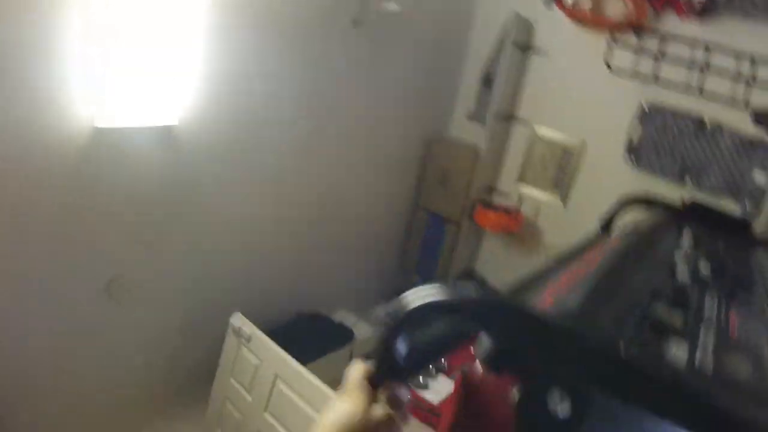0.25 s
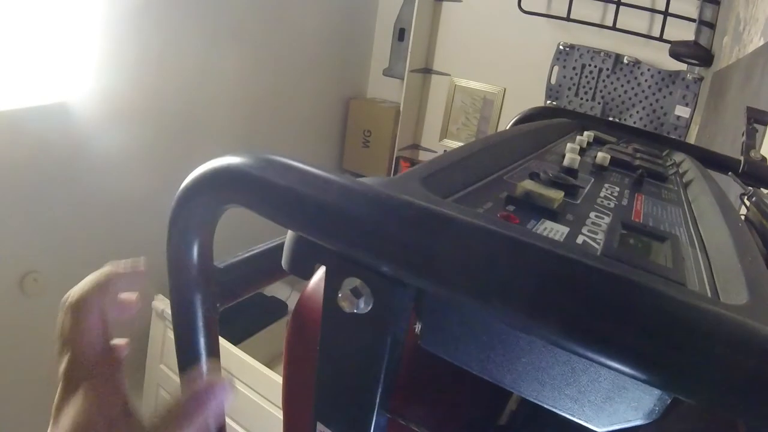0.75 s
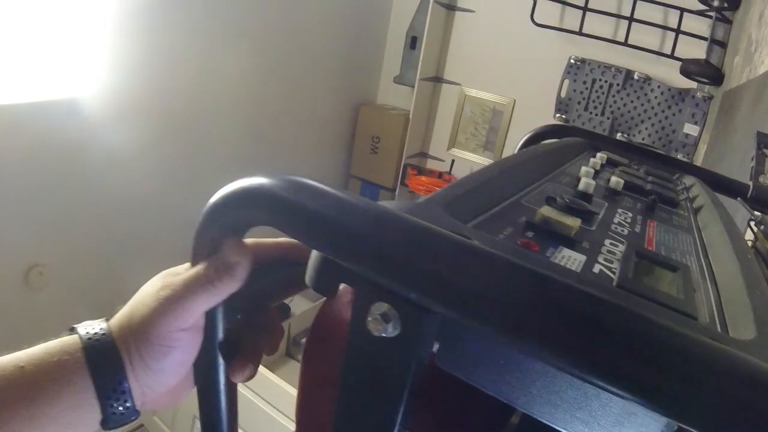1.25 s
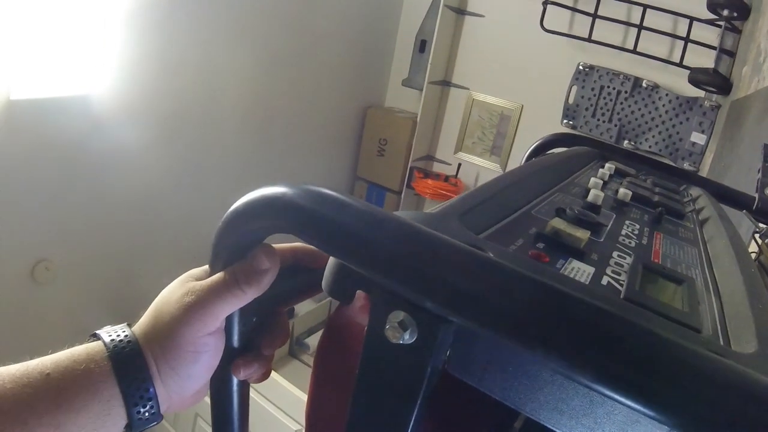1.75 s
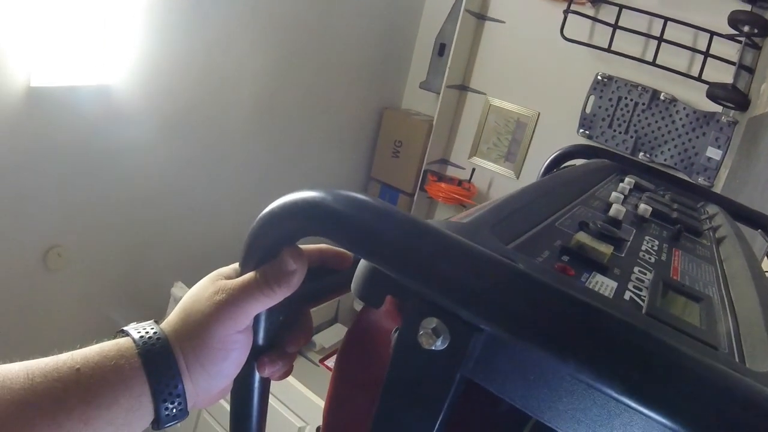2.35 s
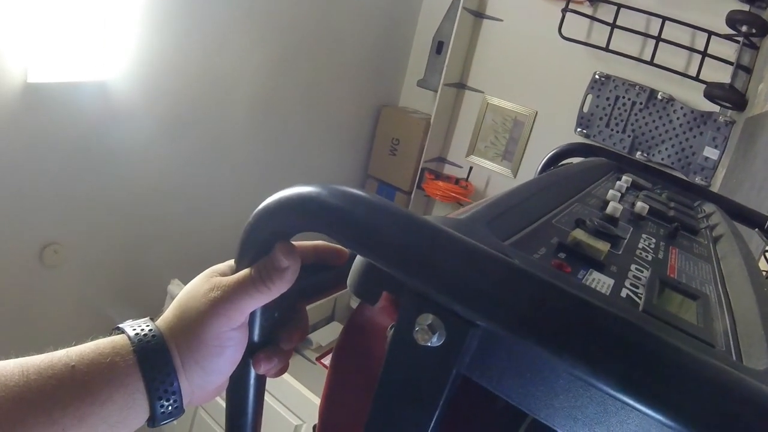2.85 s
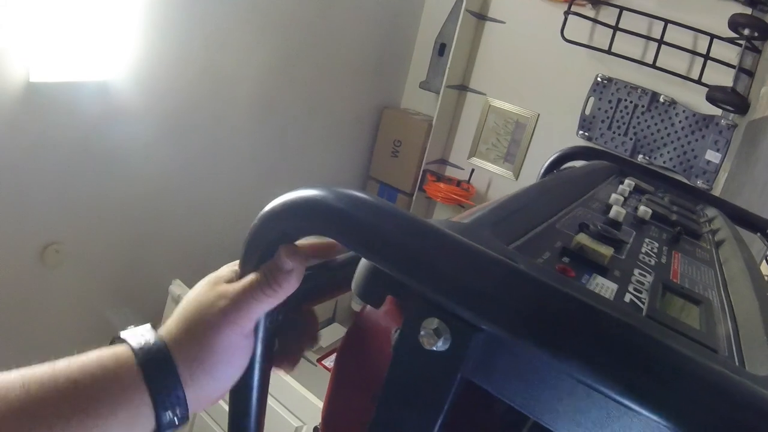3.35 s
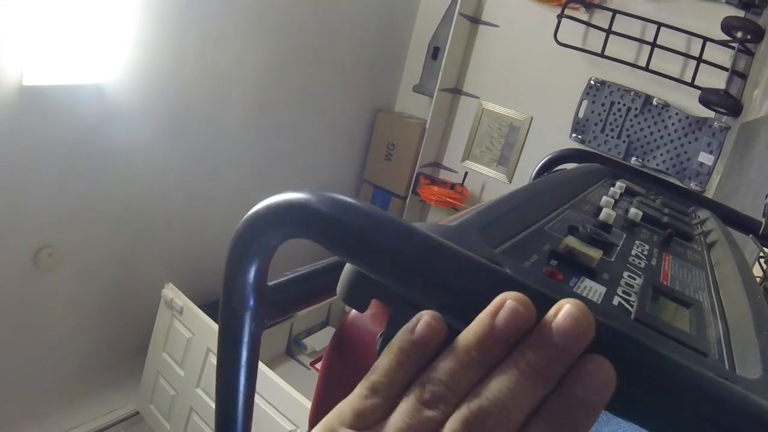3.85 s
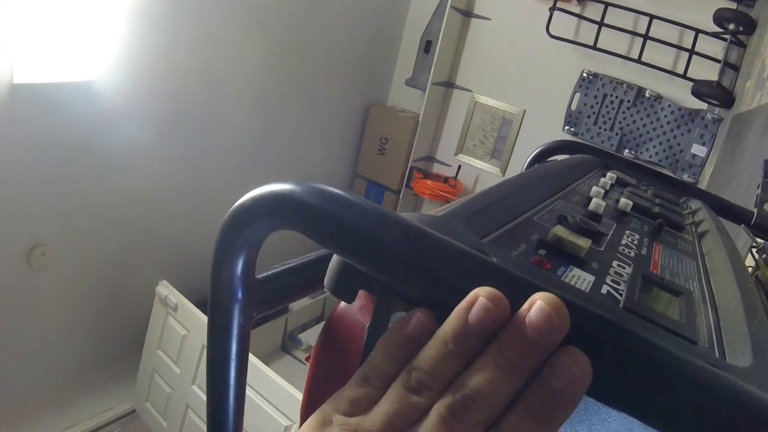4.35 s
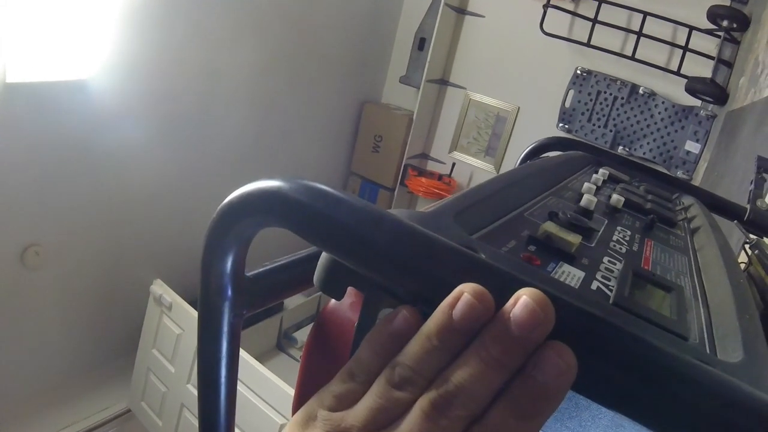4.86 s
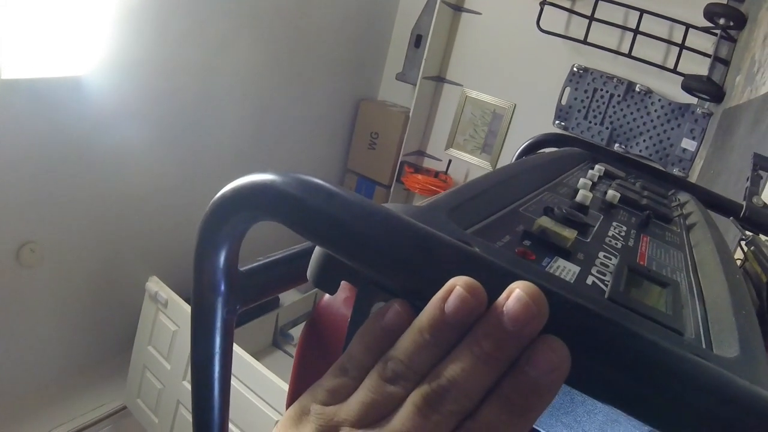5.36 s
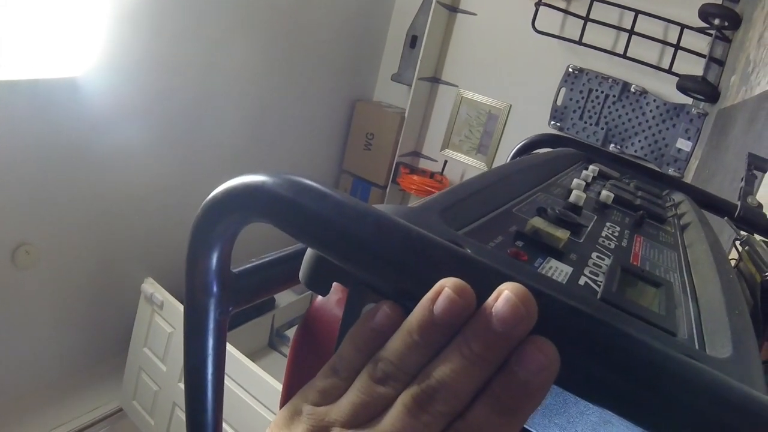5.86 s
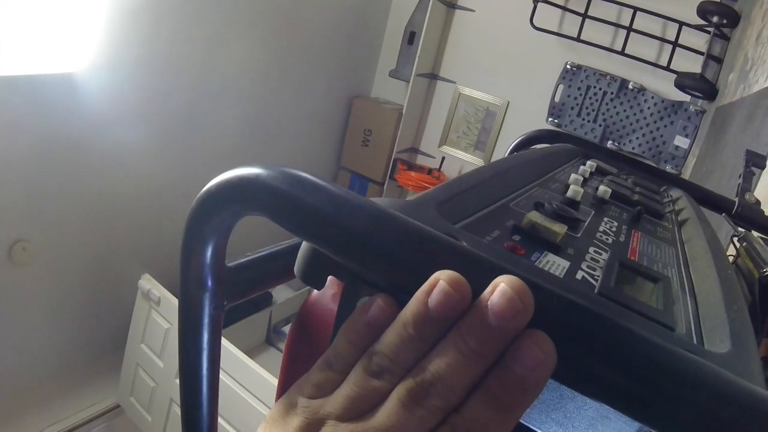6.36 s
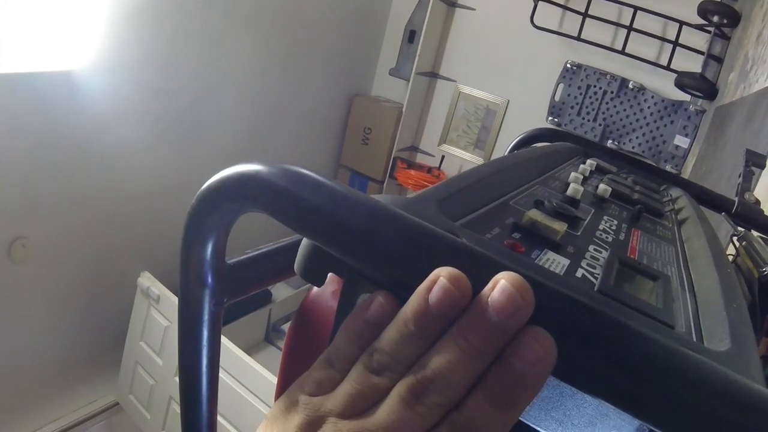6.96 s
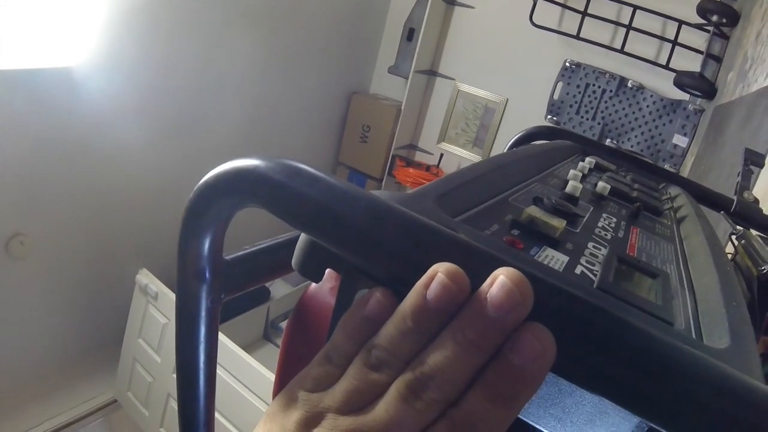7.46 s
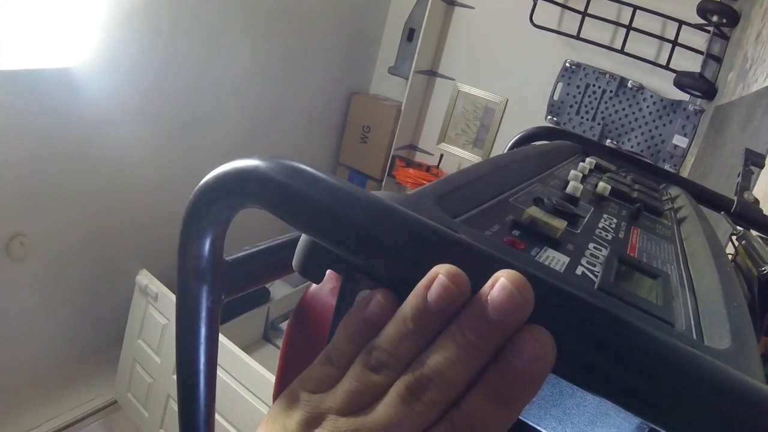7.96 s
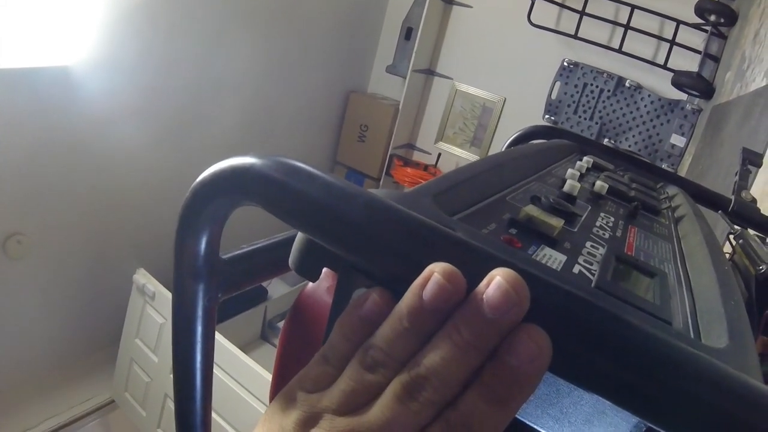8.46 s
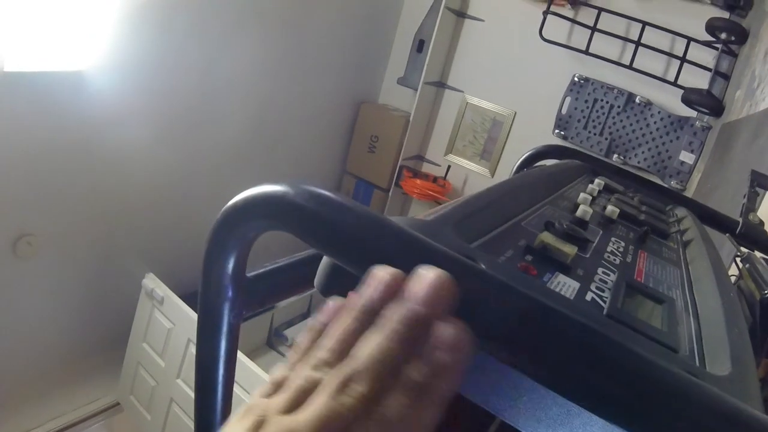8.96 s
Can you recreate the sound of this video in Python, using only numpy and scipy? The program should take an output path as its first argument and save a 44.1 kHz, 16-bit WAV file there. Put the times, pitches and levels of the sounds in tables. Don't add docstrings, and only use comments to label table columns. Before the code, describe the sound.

Short trigger pulls, one racing high and braking hard, lead to a long grinding drill run into a metal frame, ending in sharp cracks and a brief restart.

```python
import sys
import numpy as np
from scipy import signal
from scipy.fft import rfft, irfft
from scipy.io import wavfile
from scipy.ndimage import uniform_filter1d

SR = 44100
rng = np.random.default_rng(int(sys.argv[2]) if len(sys.argv) > 2 else 0)


def master_out(mix):
    frames = np.transpose(np.atleast_2d(mix))
    ceiling = np.clip(frames, -1, 1)
    pcm = np.round(ceiling * 32767).astype(np.int16)
    wavfile.write(sys.argv[1], SR, pcm)


def gain_from_db(level_db):
    decades = np.asarray(level_db, float) / 20
    return 10 ** decades


N = 406161
TIME = np.arange(N) / SR


def unit(x):
    return x / np.sqrt(np.mean(x ** 2))


def walk(rate):
    hold = int(SR / rate)
    steps = np.repeat(rng.standard_normal(N // hold + 1), hold)
    smooth = uniform_filter1d(uniform_filter1d(steps, hold), hold)
    return 1.083 * smooth[:N]


def lift(hz, peaks):
    return sum(db / (1 + (2 * (hz - centre) / width) ** 2) for centre, width, db in peaks)


def colour(x, table, peaks=()):
    size = 8192
    hz = np.maximum(np.arange(size // 2 + 1) * SR / size, 1)
    points = np.array(table)
    db = np.interp(np.log(hz), np.log(points[:, 0]), points[:, 1]) + lift(hz, peaks)
    cepstrum = irfft(db * np.log(10) / 20)
    cepstrum[1:size // 2] *= 2
    cepstrum[size // 2 + 1:] = 0
    response = irfft(np.exp(rfft(cepstrum)))
    return signal.oaconvolve(x, response)[:N]


def resonate(x, hz, width):
    return signal.lfilter(*signal.iirpeak(hz, hz / width, fs=SR), x)


# (frequency [Hz], level [dB per Hz])
AIR = [(8.8, -31), (15, -2.5), (60, -8), (80, -17), (119, -19.5), (172, -24), (235, -28.5), (1320, -40),
       (4110, -48.5), (6650, -42), (9620, -50.5), (13100, -39.5)]


def room_air():
    noise = colour(rng.standard_normal(N), AIR, [(820, 21, 11.0)])
    return unit(noise) * gain_from_db(-48 + 1.0 * walk(1.1))


# (time [s], level [dB])
CLOTH = [
    (0.0, -70),
    (0.006, -67),
    (0.188, -57.5),
    (0.194, -53),
    (0.206, -58.5),
    (0.364, -51),
    (0.376, -82),
    (0.4, -75),
]


def cloth_rustle():
    grains = rng.standard_normal(N) * gain_from_db(2.0 * walk(38.8))
    cloth = colour(grains, [(150, -14), (800, -2), (2500, 0), (6000, 0.5), (9000, -10), (13000, -43)])
    return unit(cloth) * gain_from_db(np.interp(TIME, *np.transpose(CLOTH), right=-100))


# (time [s], peak level [dB], pitch [Hz], length [ms], share of crack [0-1])
CLICKS = [(.097, -52, 1200, 3, .8), (.1915, -39, 7900, 3.3, 0.3), (.407, -54, 4100, 3, 0.3),
          (.578, -47, 4800, 1.9, 0.7), (0.6403, -18.5, 4000, 2, 0.47), (1.195, -45, 5800, 3, .5),
          (1.665, -53, 4700, 4, 0.4), (1.725, -29, 1010, 3, 0.52), (2.203, -16, 4000, 2.2, .8),
          (2.2403, -16.5, 6490, 3.2, 0.98), (2.4544, -30.5, 1740, 4, 0.7), (2.807, -22, 6500, 0.97, .6),
          (8.506, -6, 4901, 1.9, 0.45), (8.5124, -11, 6200, 0.96, 0.51), (8.6009, -21, 5900, 2.55, 0.7),
          (8.6113, -9.5, 5005, 1.2, 0.8), (8.6128, -12, 6705, 4, 0.32), (9.059, -46, 2260, 3.3, .2),
          (9.093, -38, 1022, 2.6, .8)]


def clicks():
    length = 2048
    out = np.zeros(N + length)
    age = np.arange(length) / SR
    band = signal.butter(4, [250, 8000], "bandpass", fs=SR)
    for start_s, db, hz, ms, share in CLICKS:
        crack = 1.57 * signal.lfilter(*band, rng.standard_normal(length))
        ring = np.sin(2 * np.pi * hz * age)
        fade = np.exp(-age * 1000 / ms)
        i = int(start_s * SR)
        out[i:i + length] += gain_from_db(db) * fade * ((1 - share) * ring + share * crack)
    return out[:N]


# (time [s], commutator rate [Hz], bite of the bit [0-1])
TRY = [
    (.64, 499, 1),
    (.7, 667, 0.65),
    (.76, 686, 0),
    (.85, 690, 0.1),
    (.91, 687, 0.25),
    (.95, 609, 0.2),
    (1.015, 424, 0.1),
]
START = [
    (1.724, 520, 0),
    (1.8, 1491, 0),
]
KICK = [
    (1.85, 2093, 0.47),
    (1.921, 2400, 0.33),
]
REV = [
    (1.97, 2493, 0.1),
    (2.05, 2602, 0.25),
    (2.151, 2613, 0),
    (2.2, 2513, 0.039),
    (2.23, 766.6, .3),
    (2.255, 495, 0.71),
]
CREEP = [
    (2.454, 420, 0),
    (2.51, 679, 0),
    (2.56, 780, 0.0053),
    (2.61, 993, 0),
    (2.71, 1240, 0),
]
BORE = [
    (2.76, 1472, .1),
    (2.81, 1618, 0.14),
    (2.87, 1675, 0.079),
    (2.945, 1677, .1),
    (3.01, 1548, 0.14),
]
HOLD = [
    (3.16, 1527, 0.21),
    (3.23, 1574, .2),
    (3.53, 1571, 0.24),
    (3.66, 1524, 0.092),
    (4.665, 1532, 0.19),
]
SURGE = [
    (4.72, 1749, .1),
    (4.81, 2050, .2),
    (4.881, 2143, 0.22),
    (4.97, 2053, 0.32),
    (5.04, 2070, .2),
    (5.11, 1810, 0.18),
]
COAST = [
    (5.2, 1464, 0.11),
    (5.37, 820, 0.22),
    (5.415, 1033, 0.11),
    (5.47, 1067, .1),
]
EASE = [
    (5.56, 1478, 0.12),
    (5.62, 1700, .2),
    (5.79, 1703, 0.28),
    (5.83, 1646, 0.092),
]
STALL = [
    (5.91, 1334, 0.098),
    (6.085, 705, 0.096),
    (6.115, 782, 0),
]
CATCH = [
    (6.175, 1403, .4),
    (6.28, 1380, 0.49),
]
PUSH = [
    (6.36, 1329, .6),
    (7.05, 1300, 0.76),
]
DEEP = [
    (7.15, 1256, 0.9),
    (8.0, 1226, 1),
]
THIN = [
    (8.15, 1212, 1),
    (8.44, 1195, 0.68),
    (8.501, 1136, 0.26),
    (8.58, 1105, 0.0097),
]
THROUGH = [
    (8.6, 1175, 0.18),
    (8.63, 1210, 0.17),
    (8.68, 1201, 0.27),
]
RELEASE = [
    (8.708, 1195, .1),
    (8.75, 1073, 0),
    (8.765, 932.5, 0.0048),
]
STOP = [
    (8.78, 782, 0),
    (8.8, 561, 0.0012),
]
RESTART = [
    (9.094, 380, 0.0031),
    (9.131, 714, 0),
    (9.16, 880, 0.0062),
    (9.21, 856, 0),
]
# (bars [dB], gear mesh [dB], bars x2 [dB], fan [dB], bars x3 [dB])
GRIPS = [(1.5, -12, -6, 0, 3), (-9, 4, -7, -6, -10), (2, -9, -1, 14, -12), (1, -11, -1.5, 5, 0),
         (0, -7, -6, -3, 2), (-5.5, 1.5, 3.5, -4, 0), (-5.5, 0.5, 3.5, -13, 0.5), (5.5, 3, -3.5, 7, 1),
         (-3, 2, -1.5, 2, 4.5), (-3, 6, -6, 5, 2.5), (1.5, -2, -3, -2, 4), (0, 4, 3, 0, 5.5),
         (1, 6, 2, -1.5, -5), (2, 0.5, -0.5, 1, 1.5), (1, 1, -4, 5.5, 3), (-6, 1, -12, -10, -13),
         (-9, 10.5, -6, 9, -6), (5.5, -0.5, -12, -10, -9), (-11, -4, 4, -6, 8)]


def motor():
    run = [CREEP, BORE, HOLD, SURGE, COAST, EASE, STALL, CATCH, PUSH, DEEP, THIN, THROUGH, RELEASE, STOP]
    squeezes = [TRY, START, KICK, REV, *run, RESTART]
    pulls = [TRY, START + KICK + REV, sum(run, []), RESTART]
    times, speeds, bites = np.vstack(pulls).T
    hz = uniform_filter1d(np.interp(TIME, times, speeds), size=700)
    bite = uniform_filter1d(np.interp(TIME, times, bites), size=700)
    grip_rows = np.repeat(GRIPS, [len(squeeze) for squeeze in squeezes], axis=0)
    grip_db = [np.interp(TIME, times, grip) for grip in grip_rows.T]

    pulled = sum((TIME > pull[0][0]) & (TIME < pull[-1][0]) for pull in pulls)
    held = uniform_filter1d(pulled * 1., size=90)
    spin_up_s = 0.028
    for pull in pulls[1:]:
        start_s = pull[0][0]
        swell = 1 - 0.83 * np.exp(np.minimum(start_s - TIME, 0) / spin_up_s)
        held = held * np.where(TIME > start_s, swell, 1)
    return hz, bite, grip_db, held


CHOPPER_HZ = 125


def tooth_impacts(turns):
    blows = np.minimum(rng.exponential(size=N // 8 + 1), 4).repeat(8)[:N]
    knocks = rng.standard_normal(N) * gain_from_db(2.0 * blows)
    shaft = 1 + 0.041 * np.sin(2 * np.pi * turns / 10)
    planet = 1 + 0.027 * np.sin(2 * np.pi * turns / 78)
    chop = 1 + 0.037 * np.sin(2 * np.pi * CHOPPER_HZ * TIME)
    return knocks * shaft * planet * chop * gain_from_db(1.0 * walk(12))


# (frequency [Hz], level [dB per Hz])
HOUSING = [(88, -56), (150, -20), (461, -16.5), (497, -16.5), (1010, -12.5), (1420, -9.5), (2020, -12.5),
           (2580, -3.5), (3350, -4), (5150, 0), (5660, -3.5), (6570, 4), (10900, -16), (13100, -47)]
# (frequency [Hz], width [Hz], lift [dB])
RINGS = [(792, 250, 3.5), (1110, 96, 2), (1779, 307, 9.5), (2660, 240, -2), (2870, 57, -0.5),
         (3767, 550, 5), (4800, 490, 4), (5250, 630, 4), (6940, 100, 3), (6960, 130, -10.5), (7000, 81, 6),
         (8940, 1000, 2.5), (9930, 570, -6)]


def rattle(turns, db, octaves, bite):
    body = unit(colour(tooth_impacts(turns), HOUSING, RINGS))
    low = signal.sosfilt(signal.butter(2, 2200, fs=SR, output="sos"), body)
    growl_db = -15.5 - 5.5 * octaves + 2 * bite
    return gain_from_db(db - 1.53) * (body - low + low * gain_from_db(growl_db + 17.5))


def whine(turns, hz, lines, rings=()):
    change = np.abs(uniform_filter1d(np.gradient(hz), size=900)) * SR
    glide = np.minimum(change / 4000, 1)
    grid = np.arange(0, 16000, 10.)
    through = np.sqrt(2 / (1 + (grid / 7800) ** 16)) * gain_from_db(lift(grid, rings))
    out = np.zeros(N)
    for multiple, db in lines:
        level_db = db - 4 * glide + (2.1 + 5.5 * glide) * walk(40)
        blur = (0.43 + 0.5 * glide) * multiple * walk(70)
        tone = np.sin(2 * np.pi * multiple * turns + blur)
        out += gain_from_db(level_db) * np.interp(multiple * hz, grid, through) * tone
    return out


# (multiple of commutator rate, level [dB])
WHINES = [
    [(1, 2), (.7, -15)],
    [(1.0667, -1), (1.148, -9), (3.13, -5)],
    [(2, -1), (1.7, -32), (2.1, -10), (4.1, -10)],
    [(2.2, 3.5), (4.4, -14)],
    [(3, 1.5), (5, -2)],
]
# (level at cruise [dB], slope [dB per octave of speed], change at full bite [dB])
WHINE_LAWS = [
    (-44, 7.5, -14),
    (-44, 3, -9),
    (-43, 12.5, -5),
    (-46, 2.5, -10),
    (-45, 16.5, -2.5),
]
# (frequency [Hz], width [Hz], lift [dB])
WHINE_RINGS = [(802, 170, 9.5), (1480, 110, 5), (1630.6, 80, 5), (1828, 154, 10), (2394, 170, 4.5),
               (2615, 180, 5), (2980, 240, 8.5), (3325, 200, 5), (3696, 130, 8.5), (4200, 121.4, 4),
               (4610, 740, 9), (5114, 500, 7), (6000, 660, -9), (6700, 300, 11)]
# (multiple of commutator rate, level over rattle [dB])
UPPER_BARS = [
    (4, -18.5),
    (6, -19),
]


def whines(turns, hz, db, octaves, bite, grip_db):
    tones = np.zeros(N)
    for lines, (level_db, slope_db, bite_db), grip in zip(WHINES, WHINE_LAWS, grip_db):
        tones += gain_from_db(level_db + slope_db * octaves + bite_db * bite + grip) * whine(turns, hz, lines, WHINE_RINGS)
    tones += gain_from_db(db - 1.34 * octaves) * whine(turns, hz, UPPER_BARS)
    slow_db = -68.0 + lift(0.3 * hz, [(786, 100, 26)])
    return tones + gain_from_db(slow_db) * whine(turns, hz, [(0.3, 0)])


# (multiple of chopper rate, level [dB])
CHOPPER = [
    (2, -60.5),
    (4, -54),
    (6, -57.5),
    (9, -55),
]


def chopper_buzz(db):
    buzz = sum(gain_from_db(level_db + 2.4 * walk(6.6)) * np.sin(2 * np.pi * multiple * CHOPPER_HZ * TIME)
               for multiple, level_db in CHOPPER)
    return buzz * gain_from_db(0.12 * (db + 13.5))


def drill():
    hz, bite, grip_db, held = motor()
    cruise_hz, stall_hz, brake_hz_per_s = 1500, 600, 19000
    octaves = np.log2(hz / cruise_hz)
    db = -24.5 + 6.5 * octaves + 2.5 * bite
    db = db - 5.5 * np.maximum(np.log2(stall_hz / hz), 0)
    db = db - np.clip(-np.gradient(hz) * SR / brake_hz_per_s, 0, 1)
    turns = np.cumsum(hz * (1 + 0.001517 * walk(30))) / SR
    noise = rattle(turns, db, octaves, bite)
    tones = whines(turns, hz, db, octaves, bite, grip_db)
    return held * (noise + tones + chopper_buzz(db))


# (time [s], level [dB])
RUB = [
    (1.12, -72),
    (1.27, -73),
    (1.304, -75),
    (1.444, -76),
    (1.458, -75),
    (1.64, -83),
]
# (frequency [Hz], width [Hz], lift [dB])
RUB_RINGS = [(2400, 300, 13), (4500, 500, 7), (3050, 200, 6)]


def palm_slide():
    grains = rng.standard_normal(N) * gain_from_db(2.0 * walk(38.8))
    palm = colour(grains, [(500, -6), (1500, -3), (6000, -9), (10000, -13)], RUB_RINGS)
    return unit(palm) * gain_from_db(9.5 + np.interp(TIME, *np.transpose(RUB), left=-100, right=-100))


# (frequency [Hz], width [Hz], level [dB])
FRAME = [(103, 10.5, 0), (165.3, 5.2, -6.5), (320, 160, -7.5)]
# (frequency [Hz], time to fade by 60 dB [s], level [dB])
TUBES = [(800, .8, -41)]
# (time [s], hum level [dB])
JOLTS = [(2.06, -40.5), (2.19, -45), (2.91, -45), (3.45, -51), (3.75, -53), (4.06, -47.5), (4.67, -48),
         (5.07, -44), (5.62, -53), (5.87, -47), (6.27, -55), (6.82, -53), (7.119, -54), (7.62, -53),
         (8.38, -53.5), (8.64, -38), (8.85, -48)]


def frame(shaken):
    push = rng.standard_normal(N)
    hum = unit(sum(gain_from_db(db) * unit(resonate(push, hz, width)) for hz, width, db in FRAME))
    tubes = sum(gain_from_db(db + 12) * resonate(shaken, hz, 2.2 / t60) for hz, t60, db in TUBES)
    rise_s, fall_s = 0.13, 0.18
    jolts = np.zeros(N)
    for peak_s, db in JOLTS:
        jolts += gain_from_db(db) * np.exp(np.minimum((TIME - peak_s) / rise_s, (peak_s - TIME) / fall_s)) ** 2
    steady = gain_from_db(-57.5 - 1.5 * walk(6.5)) * (TIME > START[0][0])
    return hum * (jolts + steady) + tubes


def garage(x):
    t60_s = 0.64
    age = np.arange(SR) / SR
    tail = rng.standard_normal((2, SR)) * (age > 0.006)
    dull = signal.lfilter([0.3], [1, -0.7], tail[0]) * gain_from_db(-60 * age / t60_s)
    bright = 0.7 * tail[1] * gain_from_db(-60 * age / (0.7 * t60_s))
    both = dull + bright
    echo = both / np.sqrt(np.sum(both ** 2))
    return signal.oaconvolve(x, echo)[:N] * gain_from_db(-13)


def scene():
    air = room_air()
    cloth = cloth_rustle()
    near = clicks() + drill()
    mix = near + palm_slide() + frame(near) + garage(near) + cloth + air
    return np.tile(mix, (2, 1))


def roll_off(x):
    return signal.sosfilt(signal.butter(12, 13290, fs=SR, output="sos"), x)


# (frequency [Hz], width [Hz], lift [dB])
MIC = (6405, 430, 5.6)


def record(dry):
    heard = colour(dry[0], [(20, -5), (60, 1.0), (10800, 0), (12500, 0)], [MIC])
    mix = np.tile(np.tanh(heard), (2, 1))
    return roll_off(mix)


dry = scene()
out = record(dry)
master_out(out)
```